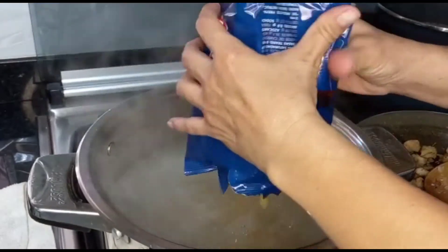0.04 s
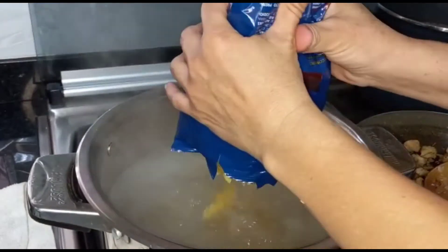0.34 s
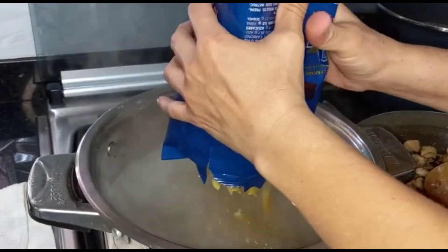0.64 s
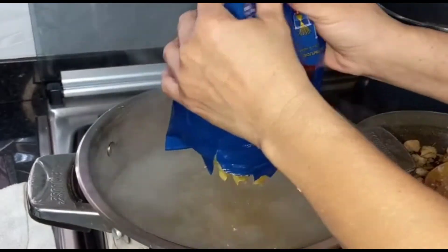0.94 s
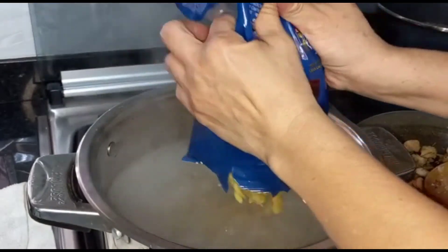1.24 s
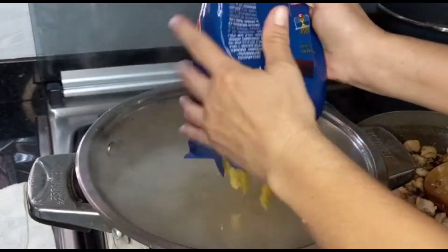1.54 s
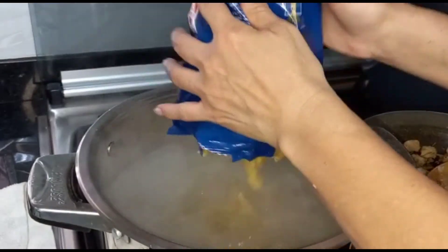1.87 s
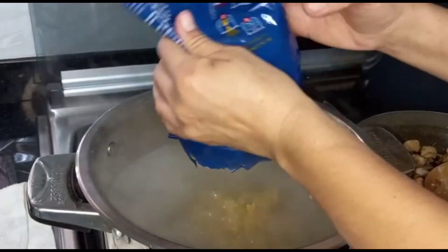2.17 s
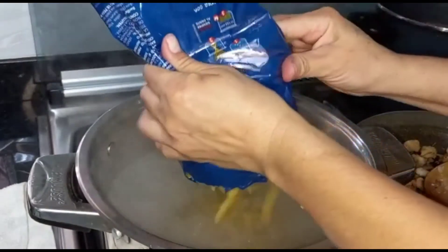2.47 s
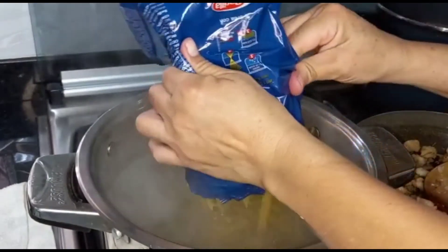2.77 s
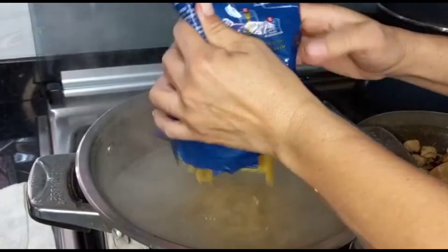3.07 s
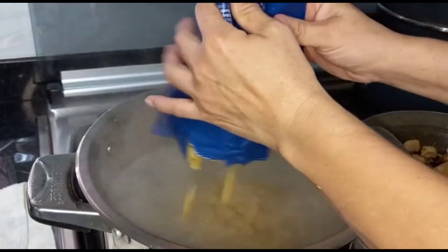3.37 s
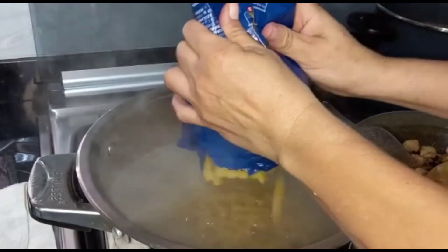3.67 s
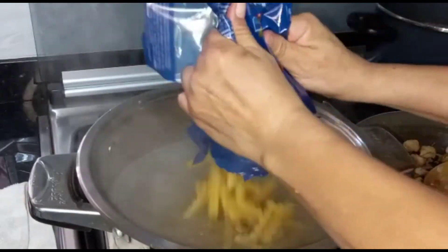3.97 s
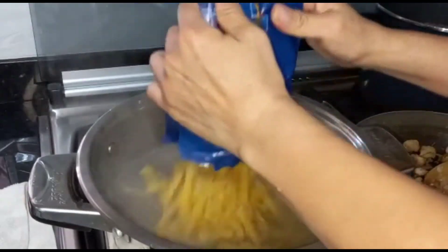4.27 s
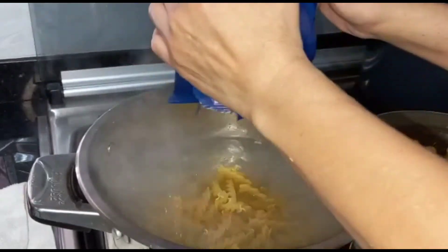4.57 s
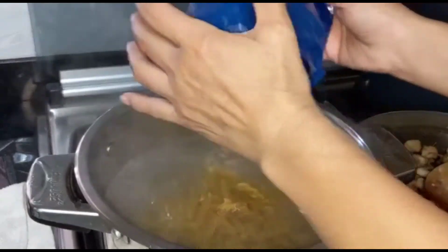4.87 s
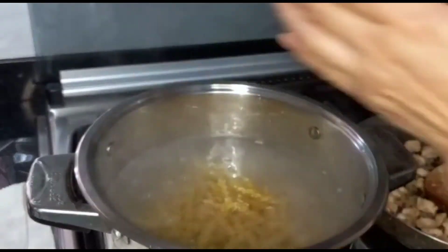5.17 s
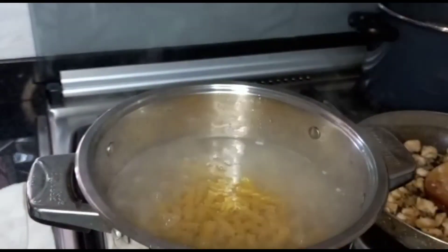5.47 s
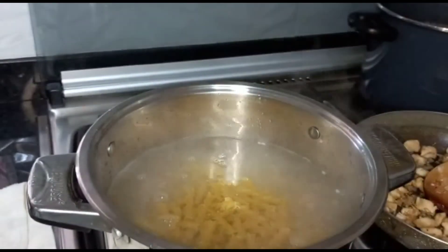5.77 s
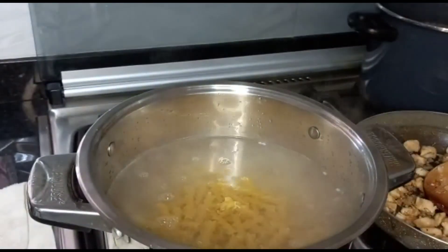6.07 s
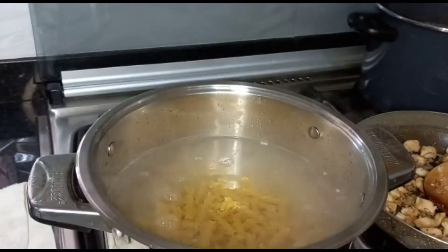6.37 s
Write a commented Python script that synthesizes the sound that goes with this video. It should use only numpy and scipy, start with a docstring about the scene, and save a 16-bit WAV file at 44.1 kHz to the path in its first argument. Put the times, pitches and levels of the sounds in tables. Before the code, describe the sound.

From the start, a plastic bag is squeezed and shaken close to the microphone, slightly to the left. It crinkles and fizzes in uneven bursts with sharp snaps, while dry pasta tubes rattle and thud softly inside. The handling eases briefly at each change of grip, with stronger crackles around 0.3, 2.7 and 3.9 seconds. At about 4.4 seconds the last pasta slides along the plastic in a short, bright hiss. A few weakening crinkles follow and are gone by about 5.1 seconds. Farther off, light wooden taps come at 5.5 and 5.7 seconds, then a quick cluster of clacks and hollow knocks from 6.0 to 6.3 seconds, like a cupboard door closing. Underneath, the burner and simmering pot murmur and hiss very faintly the whole time. The small kitchen adds a short echo.

```python
"""Dry pasta is shaken out of a plastic bag into a pot of simmering water, close by in a small kitchen.
The plastic crinkles and snaps as its creases buckle, the pasta tubes rattle and thud in the bag,
and the last ones slide out with a hiss. Afterwards something wooden, perhaps a cupboard door,
taps and knocks farther off. The stove murmurs faintly the whole time."""
import sys
import numpy as np
from scipy import signal
from scipy.fft import rfft, irfft, next_fast_len
from scipy.io import wavfile
from scipy.ndimage import uniform_filter1d, map_coordinates

SR = 44100
rng = np.random.default_rng(int(sys.argv[2]) if len(sys.argv) > 2 else 0)


def digitize_waveform(pressure):
    """Quantize a signal to 16-bit integers and store it at the path in sys.argv[1].

    Rows of a 2-D input are taken as channels; values are limited to [-1, 1].
    """
    field = np.atleast_2d(pressure).T
    bounded = np.clip(field, -1, 1)
    quanta = np.round(bounded * 32767).astype(np.int16)
    wavfile.write(sys.argv[1], SR, quanta)


N = 287973
TIME = np.arange(N) / SR
LAST_RUSH_S = 4.4  # when the last of the pasta slides out


def amp(db):
    """Turn decibels into a number to multiply a sound by."""
    return 10 ** (np.asarray(db) / 20)


def unit(x):
    """Scale a sound to an average (rms) level of 1."""
    return x / np.sqrt(np.mean(x ** 2) + 1e-20)


def unit_hit(x):
    """Give a short sound the energy of 3 ms at level 1."""
    return unit(x) * np.sqrt(.003 * SR / x.shape[-1])


def along(points, hz):
    """Read between the rows of a (frequency, value) table, on a log scale."""
    f, values = np.transpose(points)
    return np.interp(np.log(hz + 1), np.log(f), values)


def wobble(rate):
    """A smooth curve through `rate` random values a second."""
    return map_coordinates(rng.standard_normal(int(N * rate / SR) + 4), [TIME * rate])


def coloured(x, points):
    """Shape the tone with a (f/Hz, level/dB) table."""
    half = next_fast_len(x.shape[-1] // 2 + 2048)
    cepstrum = irfft(np.log(amp(along(points, np.fft.rfftfreq(2 * half, 1 / SR)))))
    # this fold makes the filter ring only after a hit, never before
    cepstrum[1:half] *= 2
    cepstrum[half + 1:] = 0
    return irfft(rfft(x, 2 * half) * np.exp(rfft(cepstrum)))[..., :x.shape[-1]]


def band(x, low_hz, high_hz):
    """Keep the sound between two frequencies."""
    return signal.sosfilt(signal.butter(2, [low_hz, high_hz], 'band', fs=SR, output='sos'), x)


# How alike left and right are (1 = the same): f/Hz, likeness
EAR_LIKENESS = [(40, 0.65), (130, 0.75), (500, .7), (1200, 0.21), (3000, 0.11), (12000, .05)]
def diffuse(size):
    """Noise from all sides, alike at both ears only in the bass."""
    turn = np.arccos(along(EAR_LIKENESS, np.fft.rfftfreq(size, 1 / SR))) / 2
    mid, side = irfft(rfft(rng.standard_normal((2, size))) * [np.cos(turn), np.sin(turn)], size)
    return np.array([mid + side, mid - side])


def grains(per_s, hz, spread, cycles, uneven_db, width, clump_db, size):
    """A stream of tiny clicks in clumps; each is pitched near `hz` and fades over about `cycles` waves."""
    count = int(per_s * N / SR)
    when, strength, phase = rng.random((3, count, 1))
    detune, skew, pan = rng.standard_normal((3, count, 1))
    pitch = np.minimum(hz * np.exp(spread * detune), SR / 2)
    turns = pitch * np.arange(size) / SR
    gain = amp(-uneven_db * np.log(np.maximum(1 - strength, .02))) * np.sqrt(pitch)
    fade = gain * np.exp(-turns / cycles)
    place = ((when * N).astype(int) + np.arange(size)).ravel()
    # each little surface sends a different sound to left and right
    ears = [fade * amp(side * 2 * pan) * np.sin(2 * np.pi * (turns + phase) + side * skew)
            for side in (width, -width)]
    clicks = np.array([np.bincount(place, ear.ravel(), N + size)[:N] for ear in ears])
    clicks *= amp(clump_db * wobble(130))
    # the hands supply energy steadily, so even out the level
    power = np.abs(uniform_filter1d(np.mean(clicks ** 2, 0), size=1500))
    return clicks / np.sqrt(power + 1e-9)


def flurries(rows, rise_s, fade_s):
    """A loudness curve from (t/s, hold/s, level/dB) rows: each rises, holds, then loses 60 dB in fade_s."""
    out, t = np.zeros(N + SR), np.arange(SR // 2) / SR
    for s, held, db in rows:
        rise = 1 - np.exp(-t / rise_s)
        out[round(s * SR):][:len(t)] += rise * amp(db - 60 * np.maximum(t - held, 0) / fade_s)
    return out[:N]


# The tone of the burner and pot: f/Hz, level/dB
STOVE_TONE = [(25, -19.5), (45, -13.5), (82, 1), (180, -9.5), (280, -5), (440, -0.5), (720, -9),
              (1110, -11.5), (1800, -22.5), (4200, -35), (6730, -25), (7900, -27.5), (9050, -15.5),
              (10600, -32), (15500, -25.5)]
def stove():
    """The burner and the simmering pot murmur and hiss faintly."""
    return amp(-63 + .5 * wobble(4)) * unit(coloured(diffuse(N), STOVE_TONE))


# How hard the hands work the bag: t/s, level/dB
HAND_EFFORT = [(0.0, -32), (0.52, -35), (0.75, -36.5), (0.97, -37), (1.1, -38), (1.35, -31.5),
               (1.72, -36.5), (1.82, -35.5), (2.07, -35.5), (2.17, -32.5), (2.48, -37), (2.64, -32),
               (2.75, -35.5), (3.11, -38), (3.37, -37), (3.53, -35.5), (4.0, -31), (4.3, -31),
               (4.36, -30.5), (4.53, -40), (4.74, -55), (5.2, -72.5)]
# Pauses to change grip: t/s, length/s, drop/dB
GRIP_PAUSES = [(0.2, .05, 6), (0.565, 0.047, 7.5), (0.846, .11, 8), (1.09, .05, 5.5), (1.63, 0.048, 1.5),
               (1.95, .1, 5.5), (2.39, .07, 10), (2.867, 0.064, 7), (3.25, .07, 4.5), (3.88, 0.016, 5),
               (4.2, .05, 2), (4.88, 0.12, 12)]
def hand_effort():
    """The strength of the handling, which eases at each change of grip."""
    slack_db = sum(drop * np.exp(-(2 * (TIME - s) / length) ** 2) for s, length, drop in GRIP_PAUSES)
    return amp(np.interp(TIME, *np.transpose(HAND_EFFORT), right=-120) - slack_db)


# Squeezes of the bag: t/s, hold/s, pasta level/dB, plastic level/dB, brightness/dB
BAG_SQUEEZES = [(0.005, 0.13, -38.5, -35.5, 3.5), (0.258, 0.016, -33.5, -29.5, -3.5),
                (0.287, 0.028, -36, -30, -2), (0.374, 0.044, -35, -33.5, 1.5), (0.482, .025, -32, -32, 1),
                (0.585, 0.058, -37.5, -35, 0.5), (0.908, 0.0085, -38.5, -33.5, 2),
                (0.993, 0.02, -31.5, -30.5, 3), (1.108, .01, -48, -36, 2.5), (1.166, 0.041, -33, -35, -5),
                (1.24, .05, -41, -35, 4), (1.41, .08, -33.5, -36, 6.5), (1.69, 0.13, -37, -35.5, 0.5),
                (2.05, 0.028, -33, -35, 0.5), (2.15, 0.076, -38, -33.5, 2), (2.423, 0.014, -37, -35, -2.5),
                (2.464, 0.05, -33.5, -35, -2), (2.505, 0.021, -37, -32, 1.5), (2.615, 0.017, -27, -26, -3),
                (2.665, 0.02, -31, -28, 0.5), (2.722, .012, -26.5, -25.5, -0.5),
                (2.775, .01, -34, -33.5, 1), (2.808, .008, -32, -38, -2), (2.904, 0.019, -32.5, -40, -1),
                (2.946, 0.0076, -46, -27.5, -7), (3.064, 0.04, -42.5, -33, 1.5),
                (3.14, 0.038, -38.5, -33.5, -2.5), (3.29, .07, -43, -40.5, 2.5),
                (3.624, 0.0079, -42, -34.5, 4.5), (3.739, 0.088, -41, -34.5, 4.5),
                (3.91, 0.01, -29.5, -24, 3), (3.978, .15, -31, -32, 1), (4.215, 0.028, -45, -33.5, 1.5),
                (4.319, 0.029, -45, -34, -1)]
def handling():
    """Loudness curves for the bag: steady effort, plus squeezes that crush it and push the pasta along."""
    steady = hand_effort()
    s, held, pasta_db, plastic_db, bright_db = np.transpose(BAG_SQUEEZES)
    pushed, crushed, crisp = [flurries(zip(s, held, db), rise_s=.0014, fade_s=.17)
                              for db in (pasta_db, plastic_db, plastic_db + bright_db)]
    # as the bag empties, the load weighs less and the plastic fizzes more
    lighten_db_per_s, brighten_db_per_s = 2, .46
    weight = amp(-18 + lighten_db_per_s * (TIME.mean() - TIME))
    shifting = weight * np.hypot(steady, amp(-5.5) * pushed)
    rattle = np.hypot(amp(-3.5) * steady, pushed)
    crinkle = np.hypot(amp(-2.5) * steady, crushed)
    fizz = amp(-8 + brighten_db_per_s * TIME) * np.hypot(amp(-2.5) * steady, crisp)
    return shifting, rattle, crinkle, fizz


# The tone of pasta tubes hitting each other: f/Hz, level/dB
TUBE_TONE = [(150, -26), (260, -13), (350, -2), (480, -0.5), (630, 0), (800, -3), (1200, 1), (1600, 1.5),
             (2200, 0), (3200, -3), (6000, -35)]
def pasta_rattle(rattle):
    """The hard tubes clack together inside the bag."""
    clacks = grains(per_s=1500, hz=1008, spread=.71, cycles=1, uneven_db=3.5,
                    width=.32, clump_db=.8, size=160)
    return amp(-1) * rattle * unit(coloured(clacks, TUBE_TONE))


def plastic_crinkle(crinkle, fizz):
    """Creases crackle and tiny patches of plastic fizz, giving way together in fits."""
    creases = grains(per_s=1700, hz=4160, spread=.44, cycles=.77, uneven_db=3.5,
                     width=.7, clump_db=.7, size=64)
    patches = grains(per_s=1700, hz=12400, spread=.24, cycles=.62, uneven_db=.5,
                     width=1, clump_db=3, size=32)
    crackling = amp(-1.94) * crinkle * unit(band(creases, 1600, 8000))
    fizzing = amp(2.5) * fizz * unit(band(patches, 6900, 19000))
    return amp(2.1 * wobble(45)) * (crackling + fizzing)


def pop(low_hz, high_hz, fade_s, width, jump):
    """The plastic jumps once, then flutters for a moment."""
    t = np.arange(SR // 40) / SR
    mid, side = rng.standard_normal((2, len(t))) * amp(-60 * t / fade_s)
    mid[0] = jump
    return unit_hit(band(np.array([mid + width * side, mid - width * side]), low_hz, high_hz))


def small_creases(crinkle, per_s=11):
    """Random rows for snaps(): lesser creases buckle until the last rush, as the crinkle rises and falls."""
    count = int(per_s * LAST_RUSH_S)
    times = (np.arange(count) + rng.random(count)) / count * LAST_RUSH_S
    return [(s, 20 * np.log10(crinkle[int(s * SR)]) + 1.5 + 1.1 * size, 8.5 * bright, 4 * side)
            for s, (size, bright, side) in zip(times, rng.standard_normal((count, 3)))]


# The main creases that buckle: t/s, level/dB, brightness/dB, left over right/dB
BIG_CREASES = [(0.0213, -25.5, 2, -0.5), (0.2253, -25.5, -1.5, -8), (0.2868, -19.5, -3, -2.5),
               (0.2949, -23, -0.5, 2), (0.392, -23.5, -7, -3.5), (0.4833, -25.5, 2.5, 6.5),
               (0.5451, -21.5, 2.5, -0.5), (0.5519, -28, 8.5, -5), (0.7662, -28, -4.5, -2.5),
               (0.9499, -21, -2, -0.5), (1.0494, -26.5, -3.5, 1), (1.1116, -26, 4.5, -3),
               (1.163, -21.5, -1, 0), (1.372, -24.5, 6.5, 0), (1.4293, -26.5, -5, 7),
               (1.4905, -24, -10, 1.5), (1.588, -24, 0, -1.5), (1.6333, -26.5, 17, -9),
               (1.6374, -28.5, 16, -1.5), (1.7159, -27, 3, 0.5), (1.7562, -25, 3, 2.5),
               (1.8232, -24, 4, 5.5), (2.028, -24, -7, 1.5), (2.0531, -21, -1, 0), (2.2308, -23, -1.5, 0),
               (2.3404, -27, -1, 2), (2.443, -23, 2, 0.5), (2.5084, -25, 4.5, -6), (2.6246, -21, -7, -4),
               (2.6667, -18, -15.5, -1.5), (2.6738, -22, -3.5, -7), (2.809, -16, -11.5, 0),
               (2.869, -21, 2.5, -3.5), (2.9467, -20.5, -2, 9.5), (2.953, -24, -0.5, -9.5),
               (3.2281, -28.5, -9, 0.5), (3.3357, -28, -5, -0.5), (3.511, -24, 4.5, 2.5),
               (3.5557, -21, 5.5, 4), (3.6317, -21, 1.5, -1.5), (3.6536, -23.5, 4, -4), (3.6972, -27, 3, 2),
               (3.8063, -22.5, -3, 1), (3.8308, -23.5, 7.5, -2.5), (3.893, -23.5, 0, 0),
               (4.0258, -21, 1.5, 0), (4.069, -23, -4, -4.5), (4.2375, -28, 1, 5.5),
               (4.2933, -25.5, 1.5, 3.5), (4.594, -28, 1, 2.5), (4.6743, -30, -7.5, -2.5),
               (4.6821, -36.5, -8.5, 4), (4.7657, -45, -15, -3.5), (4.8008, -44.5, -9, 4),
               (4.9421, -44.5, -11, -2), (4.9879, -42, 0.5, 1.5), (4.9932, -41, -1.5, -1),
               (5.0906, -52, -3, -9.5), (5.1124, -52.5, -2, 2)]
def snaps(crinkle):
    """A buckling crease cracks; a tight, bright one adds more tick, a broad, dull one more knock."""
    out = np.zeros((2, N + SR))
    for s, db, bright_db, pan_db in [*BIG_CREASES, *small_creases(crinkle)]:
        knock = amp(-4 - bright_db) * pop(500, 2200, fade_s=.008, width=.38, jump=2.8)
        crack = pop(2100, 7500, fade_s=.012, width=.91, jump=4.9)
        tick = amp(bright_db) * pop(7500, 16000, fade_s=.0055, width=1, jump=4.6)
        snap = amp(db + 1.5) * unit_hit(knock + crack + tick) * amp([[pan_db / 2], [-pan_db / 2]])
        out[:, round(s * SR):][:, :snap.shape[1]] += snap
    return out[:, :N]


# The pasta lands in the bag after a jerk: t/s, level/dB
LANDINGS = [(0.124, -34.5), (0.28, -36.5), (0.643, -34.5), (0.717, -47), (0.913, -38.5), (1.006, -34.5),
            (1.451, -35), (1.78, -40.5), (2.057, -33), (2.725, -32.5), (2.78, -41.5), (3.373, -41.5),
            (3.901, -39), (4.074, -45), (4.286, -40), (4.369, -37.5)]
def pasta_thuds(shifting):
    """The whole load thuds as it shifts and lands, and pumps the air in the bag."""
    landing = flurries([(s, 0, db) for s, db in LANDINGS], rise_s=.0023, fade_s=.16)
    bumps = grains(per_s=350, hz=320, spread=.37, cycles=.8, uneven_db=-.5,
                   width=.13, clump_db=1, size=512)
    thuds = amp(-2.5) * np.hypot(shifting, amp(5) * landing) * unit(band(bumps, 230, 470))
    puffs = np.hypot(amp(-6.5) * landing, amp(-10.5) * shifting) * unit(band(diffuse(N), 70, 210))
    return thuds + puffs


# The tone of pasta rubbing on plastic: f/Hz, level/dB
SLIDE_TONE = [(500, -18), (2600, 1.5), (4500, -3), (6500, 0), (9000, -3.5), (13000, 3.5), (15500, -2)]
def pasta_slide(rise_s=.031, fall_s=.074):
    """So many tubes rub along the plastic at once that they merge into a hiss, which swells and fades."""
    t = TIME - LAST_RUSH_S
    swell = np.exp(-.5 * (t / np.where(t < 0, rise_s, fall_s)) ** 2)
    return swell * amp(-25.5 + 1.2 * wobble(120)) * unit(coloured(diffuse(N), SLIDE_TONE))


# The notes a wooden panel rings at: f/Hz, width/Hz, level/dB
PANEL_NOTES = [(100, 44, -6.5), (232, 86, -10), (506, 210, 2), (630, 92, -3.5), (1420, 240, -10)]
# The tone of a hard clack: f/Hz, level/dB
CLACK_TONE = [(200, -18), (700, -6.5), (1100, -5.5), (1520, -2), (1900, -2), (3200, -3), (4500, -8.5),
              (6800, -10), (9000, -14), (15000, -23)]
# Knocks across the room: t/s, clack level/dB, thud level/dB
WOOD_KNOCKS = [(5.535, -43.5, -70), (5.726, -50, -75), (5.925, -64.5, -80), (6.039, -33, -62),
               (6.064, -39.5, -29), (6.073, -35.5, -43.5), (6.107, -45.5, -39), (6.18, -46, -50),
               (6.2, -52, -47), (6.256, -55.5, -37.5), (6.268, -64, -40.5)]
def wood_knocks():
    """Each knock is a hard clack and the panel's hollow thud, heard mostly by way of the walls."""
    out, size = np.zeros((2, N + SR)), SR // 2
    f = np.fft.rfftfreq(size, 1 / SR)
    ringing = sum(amp(db) * 1j * f * width / (hz * hz - f * f + 1j * f * width)
                  for hz, width, db in PANEL_NOTES)
    thud = unit_hit(irfft(ringing, size))
    clack = unit_hit(coloured(signal.unit_impulse(size), CLACK_TONE))
    for s, clack_db, thud_db in WOOD_KNOCKS:
        knock = amp(clack_db) * clack + amp(thud_db) * thud
        early = amp(-4) * echoes(knock, delay_s=0, stretch=.18, size=4096)[:, :size]
        walls = echoes(knock, delay_s=.003, stretch=1, size=size)[:, :size]
        out[:, round(s * SR):][:, :size] += early + walls
    return out[:, :N]


# How long the kitchen's echo takes to fall 60 dB, before stretching: f/Hz, fade/s
KITCHEN_FADE = [(150, 0.38), (600, 0.37), (3500, 0.39), (9000, 0.28), (15000, 0.23)]
def echoes(x, delay_s, stretch, size):
    """Sound bounces back after a delay, each frequency dying at its own speed."""
    hz, t, noise = signal.stft(diffuse(size), SR, nperseg=256)
    fade_s = stretch * along(KITCHEN_FADE, hz)[:, None]
    tail = signal.istft(noise * amp(-60 * t / fade_s), SR, nperseg=256)[1]
    tail = np.pad(tail / np.linalg.norm(tail[0]), ((0, 0), (int(delay_s * SR), 0)))
    return signal.fftconvolve(np.atleast_2d(x), tail, axes=1)[:, :N]


def kitchen(x, size=20000):
    """Pot, stove top and room echo; the hands and bag move, so each piece of sound gets new echoes."""
    out = np.zeros((2, N + SR))
    for start in range(0, N, size):
        piece = x[:, start:start + size]
        stove_top = amp(-10) * echoes(piece, delay_s=.001, stretch=.12, size=4096)
        room = amp(-6.5) * echoes(piece, delay_s=.006, stretch=1.31, size=20000)
        for echo in (stove_top, room):
            out[:, start:][:, :echo.shape[1]] += echo
    return out[:, :N]


def from_left(x, lead_s=.000068):
    """The bag is a little to the left, so its sound arrives there first."""
    size = next_fast_len(N + SR // 10)
    shift = np.pi * np.fft.rfftfreq(size, 1 / SR) * lead_s
    return irfft(rfft(x, size) * np.exp(1j * np.array([shift, -shift])), size)[:, :N]


def scene():
    """The bag is close, the knocks are farther off, the stove is always there."""
    shifting, rattle, crinkle, fizz = handling()
    bag = pasta_rattle(rattle) + plastic_crinkle(crinkle, fizz) + pasta_thuds(shifting)
    rustle = from_left(bag + pasta_slide())
    cracks = from_left(snaps(crinkle))
    return rustle + cracks + kitchen(rustle + amp(1) * cracks) + wood_knocks() + stove()


# The microphones' tone, with a peak just below 7 kHz and a dip above: f/Hz, level/dB
MICROPHONE_TONE = [(4800, -0.5), (6800, 5), (7400, -4.5), (8300, -6.5), (10000, -3.5), (12500, -2),
                   (15500, -3.5)]
def record(dry):
    """The microphones colour the sound, and the very highest treble is cut off."""
    size, top_hz = next_fast_len(N + SR // 2), 15900
    spectrum = rfft(coloured(dry, MICROPHONE_TONE), size)
    return irfft(spectrum * (np.fft.rfftfreq(size, 1 / SR) < top_hz), size)[:, :N]


dry = scene()
out = record(dry)
digitize_waveform(out)
```